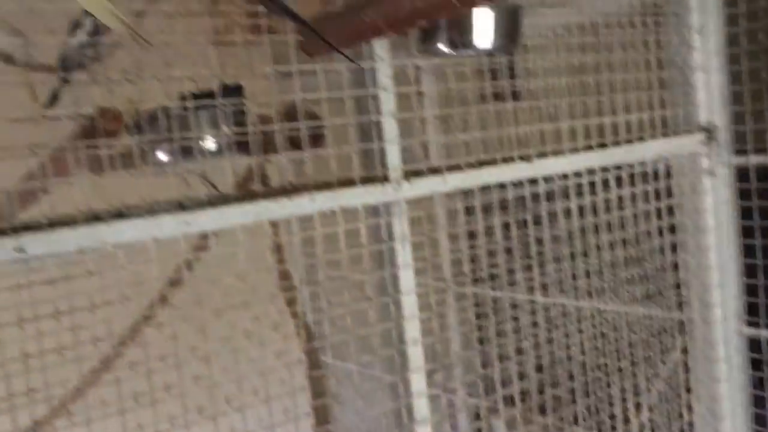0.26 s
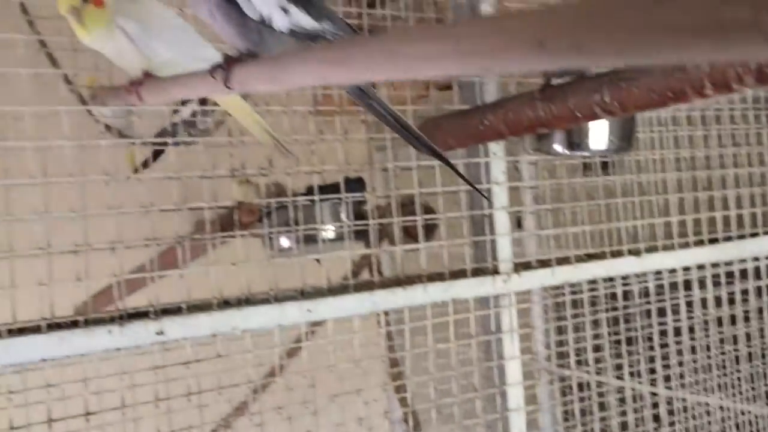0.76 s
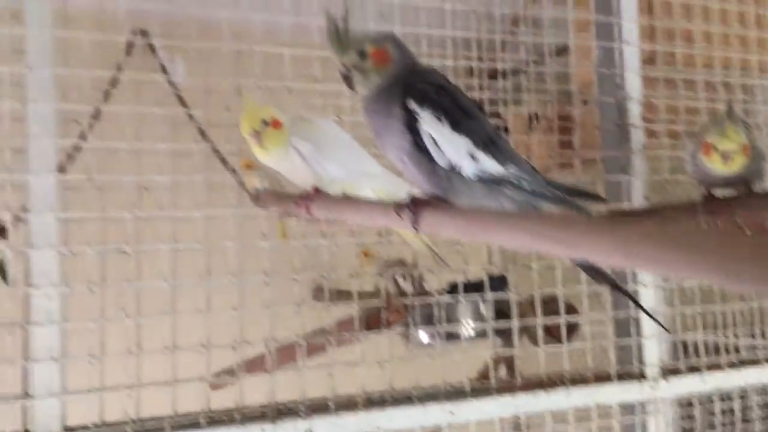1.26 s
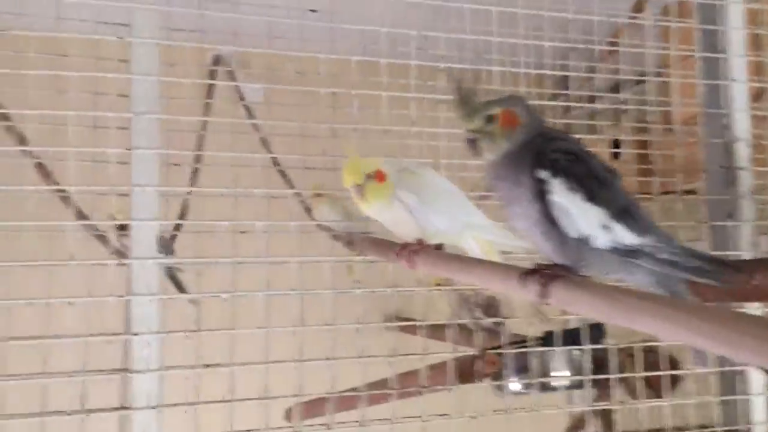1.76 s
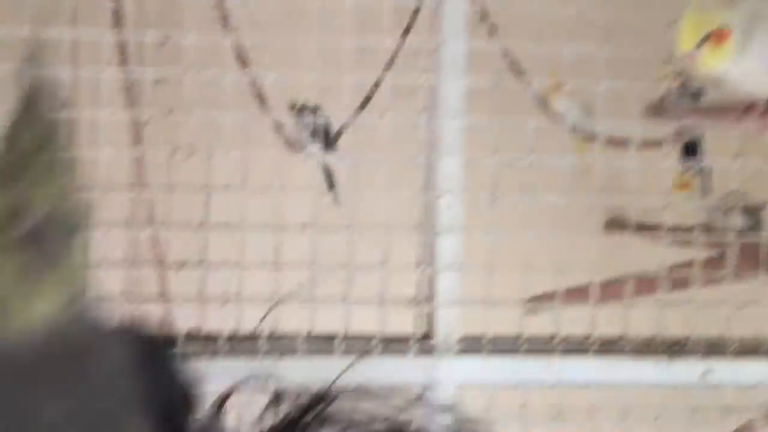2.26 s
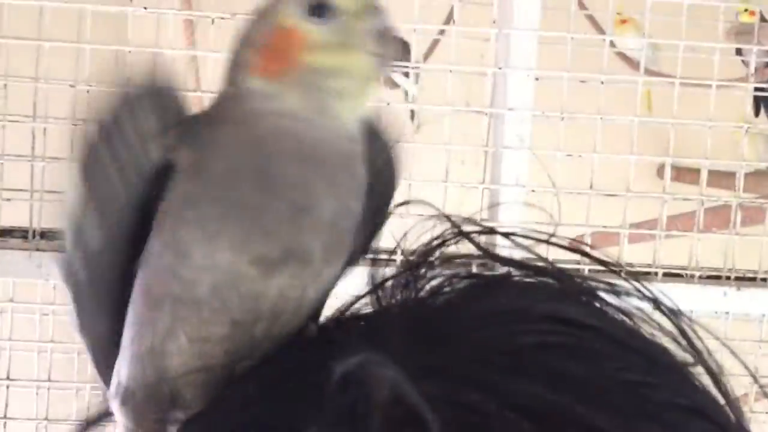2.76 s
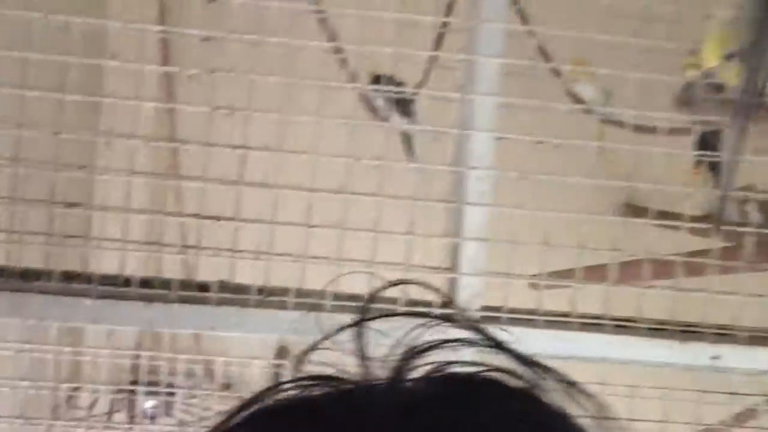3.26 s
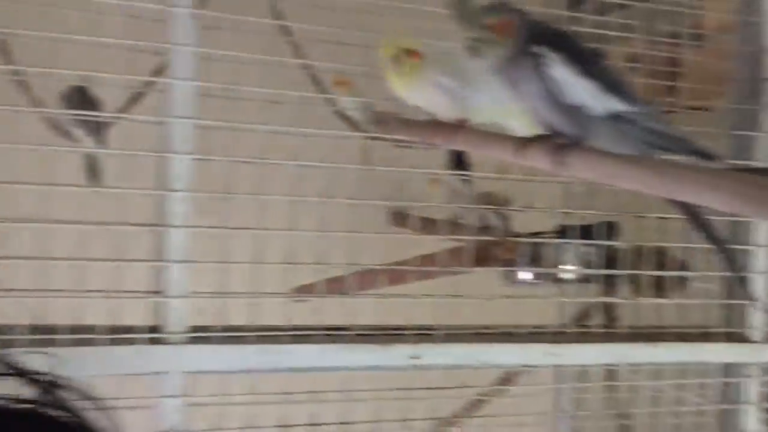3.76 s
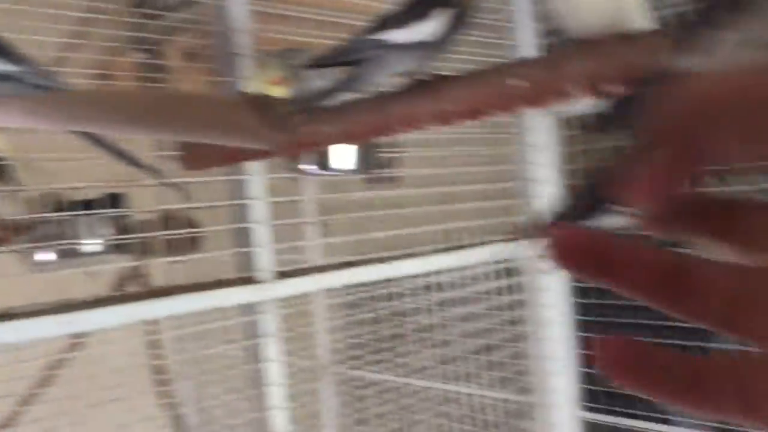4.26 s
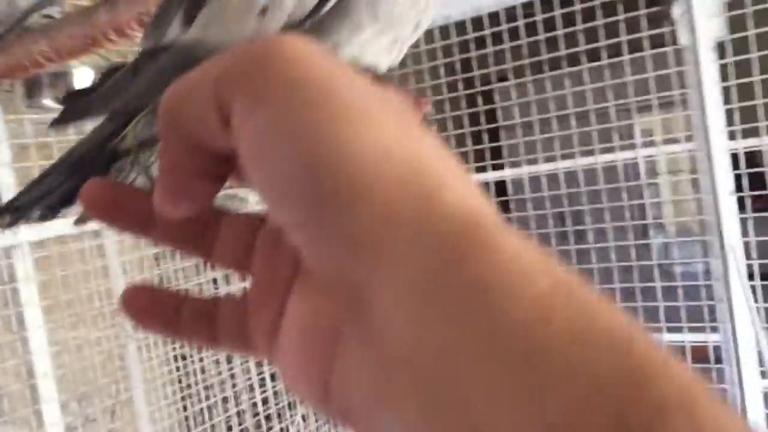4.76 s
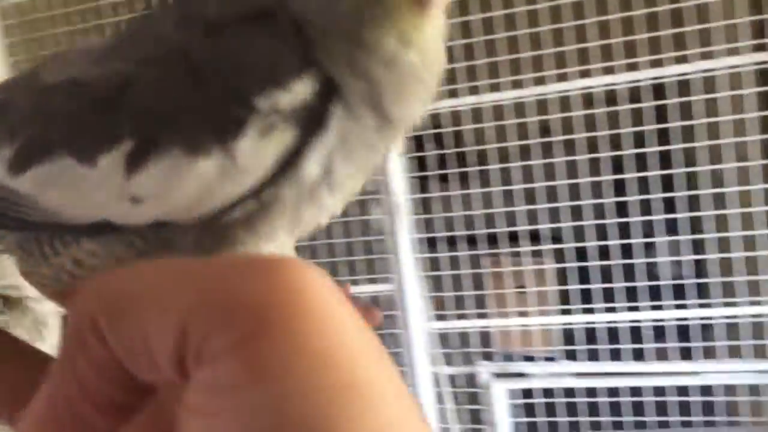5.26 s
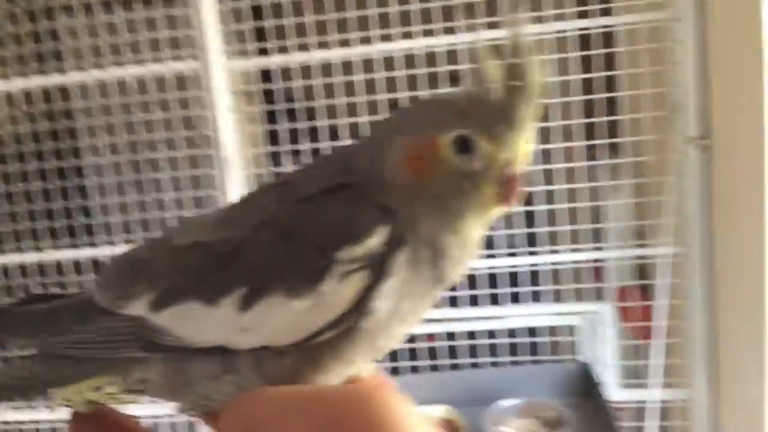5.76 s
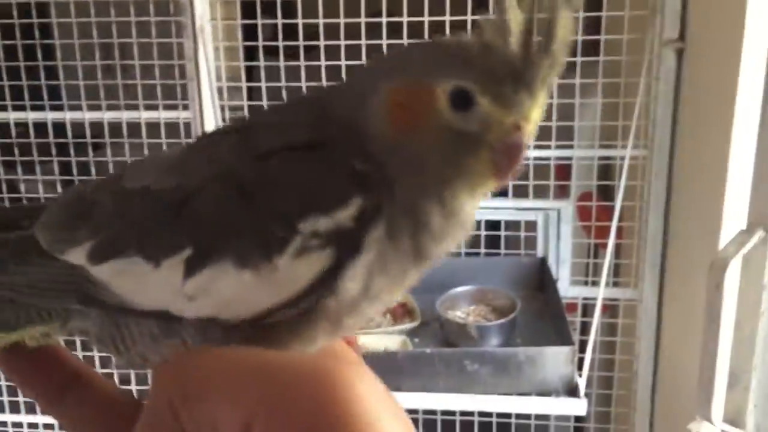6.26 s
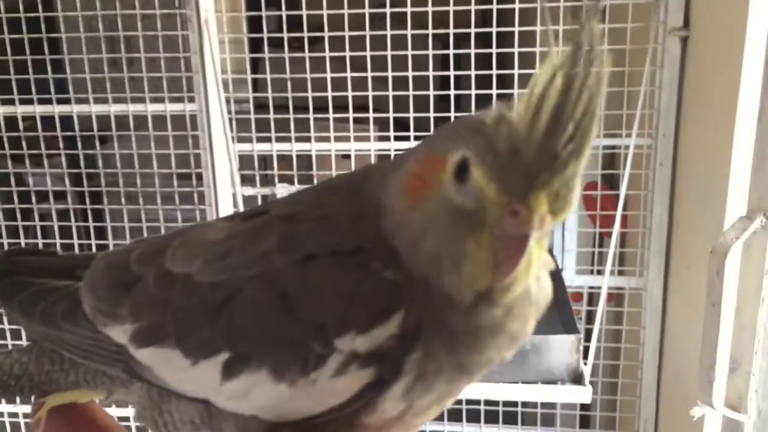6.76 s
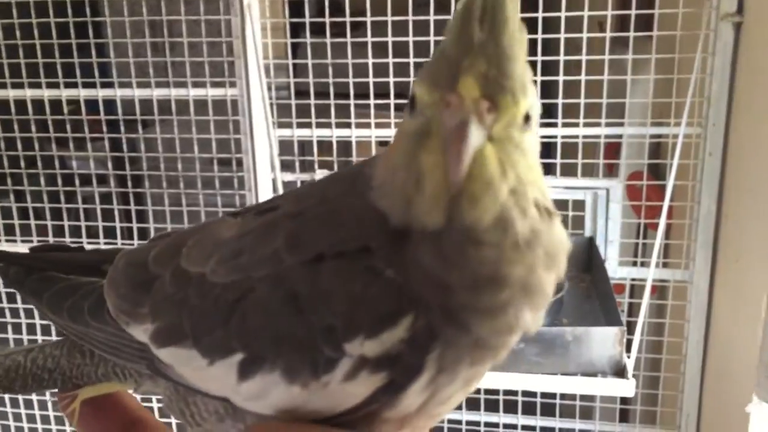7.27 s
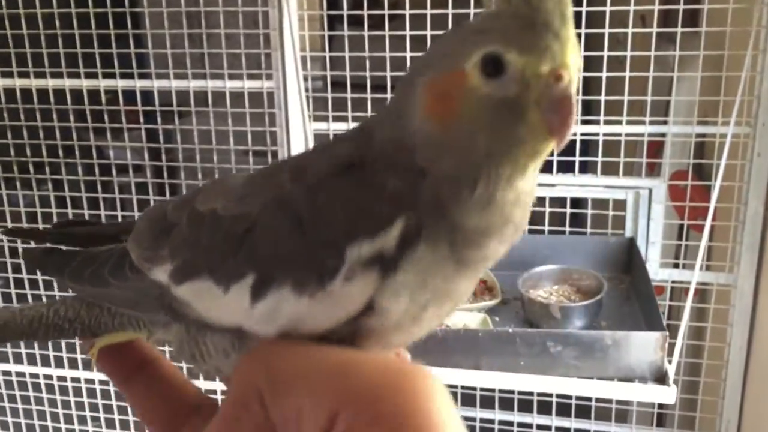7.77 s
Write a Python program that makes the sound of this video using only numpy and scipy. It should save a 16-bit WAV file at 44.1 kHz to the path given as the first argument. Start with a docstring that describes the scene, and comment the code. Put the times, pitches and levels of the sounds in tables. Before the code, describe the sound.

In a hard, echoing aviary, soft feather flutters and faint wire ticks lead to one loud, harsh cockatiel squawk. A bird takes off close by, its wings rustling and its draught thumping the handheld microphone. Then come a rising raspy call, a piercing falling whistle and, later, a broken chain of squawks and chirps, over low throbbing rumble and very faint hiss.

```python
"""Cockatiels in an echoing aviary

Cockatiels squawk and whistle near and far: harmonics of the syrinx, filtered by throat and beak.
Claws and beaks ping cage wires (scratched stiff modes); a bird takes off past a handheld microphone,
its wings rustling (strokes of shaped noise) and their draught thumping on the port (damped swings).
A low rumble throbs (swells of bass noise) under a faint, patchy hiss (noise in half-octave bands).
Feedback delays echo the birds, wires and wings."""
import sys
import numpy as np
from scipy import signal
from scipy.fft import rfft, irfft, next_fast_len
from scipy.io import wavfile
from scipy.ndimage import uniform_filter1d

SR = 44100
rng = np.random.default_rng(int(sys.argv[2]) if len(sys.argv) > 2 else 0)


def bounce(signal):
    """Save signal as a 16-bit WAV file at the path given by the first command-line argument."""
    frames = np.transpose(np.atleast_2d(signal))
    limited = np.clip(frames, -1, 1)
    pcm = np.round(limited * 32767).astype(np.int16)
    wavfile.write(sys.argv[1], SR, pcm)


N = 353682


def amp(db):
    """Decibel law: level to amplitude gain."""
    return 10 ** (np.asarray(db) / 20)


def rms_one(x):
    """Normalisation: a signal divided by its root mean square."""
    return x / np.sqrt(np.mean(x ** 2) + 1e-20)


def at_hz(points, hz):
    """Log-frequency interpolation: a curve of (hz, value) read at any frequency."""
    points = np.array(points)
    return np.interp(np.log(hz), np.log(points[:, 0]), points[:, 1])


def level(rows):
    """Envelope: gain along a curve of (time_s, level_db), silent outside it."""
    s, db = np.transpose(rows)
    return amp(np.interp(np.arange(N) / SR, s, db, left=-200, right=-200))


def wander(size, rate_hz, count=1):
    """Low-passed noise: rows of smooth random motion of spread 1, from a double pole."""
    r = np.exp(-2 * np.pi * rate_hz / SR)
    run_in = round(SR / rate_hz)
    noise = rng.standard_normal((count, size + run_in))
    smooth = rms_one(signal.lfilter([1], [1, -2 * r, r * r], noise))
    return smooth[:, run_in:].squeeze()


def coloured(spectrum):
    """Spectral shaping: white noise weighted by a curve of (hz, density_db), scaled to rms 1."""
    hz = np.maximum(np.fft.rfftfreq(N, 1 / SR), 1)
    return rms_one(irfft(rfft(rng.standard_normal(N)) * amp(at_hz(spectrum, hz)), N))


def ring(x, hz, t60):
    """Damped resonator: a unit click starts a sine of height 1 that loses 60 dB in t60 seconds."""
    r, w = amp(-60 / (t60 * SR)), 2 * np.pi * hz / SR
    return signal.lfilter([0, np.sin(w)], [1, -2 * r * np.cos(w), r * r], x)


def add(out, s, x):
    """Superposition: x summed into out from time s."""
    i = round(s * SR)
    out[i:i + len(x)] += x[:N - i]


# relative spectral density of the room hiss: hz, density_db
HISS_COLOUR = [(120, -25), (200, 0.5), (588, -12), (1390, -11), (3280, -19.5), (4390, -19.5), (4810, -23),
               (12900, -33), (15800, -32)]
# gain of the hiss over time: time_s, level_db
HISS_LEVEL = [(0, -60), (.6, -70.5), (1.3, -69.5), (4, -64), (5.6, -64.5), (5.9, -70), (8.02, -69.5)]


def hiss():
    """Independent band modulation: each half-octave of noise swells and sinks on its own."""
    out, noise = 0, rfft(coloured(HISS_COLOUR))
    hz = np.maximum(np.fft.rfftfreq(N, 1 / SR), 100)
    band = np.floor(2 * np.log2(hz / 100))   # all below 100 Hz joins the lowest band
    for k in np.unique(band):
        # drawn at every 50th sample, so the 300 Hz motion slows to 6 Hz
        patches = np.repeat(wander(N // 50 + 1, rate_hz=300), 50)[:N]
        swell = amp(4 * uniform_filter1d(patches, size=50))
        out = out + irfft(noise * (band == k), N) * swell
    return level(HISS_LEVEL) * out


# gain of the rumble bed over time: time_s, level_db
RUMBLE_LEVEL = [(0, -55), (.45, -56), (.6, -64), (1.05, -68.5), (1.3, -73), (3.4, -48), (4, -59.5),
                (8.02, -61.5)]
# relative spectral density of the bed: hz, density_db
RUMBLE_COLOUR = [(13, -48.5), (22, -38), (70, 15.5), (119, -3), (265, -9.5), (300, -10), (450, -11),
                 (580, -48.5), (990, -120)]
# evenly spaced runs of throbs: first_s, end_s, period_s, level_db
THROB_RUNS = [(0.195, .3, .3, -41.5), (1.087, 1.2, .3, -47.5), (1.389, 2.8, 0.3, -42.5),
              (3.52, 4.5, 0.27, -46.5), (4.705, 6.9, .34, -46.5), (7.05, 8, .315, -45)]
# upper band edge of the throbs over time: time_s, edge_hz
THROB_TOP = [(0, 95), (4, 105), (4.7, 145), (6, 183), (8.02, 195)]
THROB_BOTTOM_HZ, THROB_RISE_S, THROB_T60_S = 45, .026, .94


def rumble():
    """Periodic amplitude modulation: swells of band-limited bass noise repeat over a deep noise bed."""
    out, t = level(RUMBLE_LEVEL) * coloured(RUMBLE_COLOUR), np.arange(SR // 2) / SR
    for first, end, period, db in THROB_RUNS:
        swell = (1 - np.exp(-t / THROB_RISE_S)) * amp(db - 60 * t / THROB_T60_S)
        for s in np.arange(first, end, period):
            top_hz = np.interp(s, *np.transpose(THROB_TOP))
            band = signal.butter(4, [THROB_BOTTOM_HZ, top_hz], "band", fs=SR, output="sos")
            settled = signal.sosfilt(band, rng.standard_normal(SR))[SR // 2:]
            add(out, s, rms_one(settled) * swell)
    return out


# puffs of wing draught on the port: start_s, peak_db, swing_hz
PUFFS = [(2.946, -10.5, 56.5), (2.988, -20, 116), (3.038, -32, 58.5), (3.113, -32, 76), (3.166, -25.5, 85),
         (3.195, -26.5, 91.5), (3.222, -20, 123), (3.296, -23.5, 98)]
PUFF_T60_CYCLES = 7.5


def draught():
    """Impulse excitation: each puff is a soft push of air that sets the port in a damped swing."""
    out = np.zeros(N)
    for s, db, hz in PUFFS:
        push = np.zeros(SR // 4)
        push_length = round(.3 * SR / hz)   # under a third of a cycle
        push[:push_length] = np.hanning(push_length)
        swing = ring(np.gradient(push), hz, PUFF_T60_CYCLES / hz)
        add(out, s, amp(db) * swing / abs(swing).max())
    return out


# relative spectral density of the feather noise: hz, density_db
FEATHERS = [(250, -21.5), (600, -2.5), (1500, -5), (3000, -11), (6000, -11), (10500, -15), (13000, -14),
            (15800, -7)]
# downstrokes of wings and single shakes of feathers: start_s, level_db
STROKES = [(.039, -61), (0.112, -45), (0.206, -46), (0.294, -46), (.409, -62), (.724, -67), (.795, -60),
           (1.956, -54.5), (2.014, -55), (2.533, -52), (2.851, -57), (2.898, -39), (3.016, -48.5),
           (3.109, -50), (3.225, -51.5), (3.312, -49.5), (3.416, -42.5), (3.516, -45.5), (3.601, -46),
           (3.733, -52), (3.815, -55.5), (4.241, -57), (4.3, -50.5), (5.301, -56), (5.374, -56.5),
           (5.453, -51.5), (5.519, -52.5), (5.606, -76.5)]
STROKE_RISE_S, STROKE_T60_S, UPSTROKE_DB = .0096, .23, -11.5
SNAP_DB, SNAP_T60_S = -5, .053   # each stroke opens with a snap
FLIGHT_GAP_MIN_S, FLIGHT_GAP_MAX_S = .08, .14   # downstrokes this far apart have an upstroke midway


def wings():
    """Friction noise: feathers rustle at each stroke; in flight a weaker upstroke falls between."""
    envelope, t = np.zeros(N), np.arange(SR // 4) / SR
    snap = amp(SNAP_DB - 60 * t / SNAP_T60_S)
    stroke = (1 - np.exp(-t / STROKE_RISE_S)) * amp(-60 * t / STROKE_T60_S) + snap
    for (s, db), (next_s, _) in zip(STROKES, STROKES[1:] + [(np.inf, 0)]):
        add(envelope, s, amp(db) * stroke)
        if FLIGHT_GAP_MIN_S < next_s - s < FLIGHT_GAP_MAX_S:
            add(envelope, (s + next_s) / 2, amp(db + UPSTROKE_DB) * stroke)
    flicker = amp(1.7 * wander(N, rate_hz=40))
    return envelope * flicker * coloured(FEATHERS)


# pings of cage wires, peaks before the mix; the last row instead adds a bright ringing to a small chirp at 7.87
# s: start_s, peak_db, wire_constant_hz
PINGS = [(1.186, -45, 199), (1.302, -40, 195.6), (1.424, -32.5, 258.6), (1.564, -38.5, 226),
         (1.691, -40.5, 221), (1.938, -44, 228.5), (3.902, -45.5, 229), (4.117, -48, 228),
         (4.226, -34.5, 226), (5.77, -64.5, 211.5), (6.266, -58.5, 214.4), (6.435, -44.5, 234.2),
         (6.76, -42, 205), (7.875, -62.5, 252)]
SCRATCH_RISE_S, SCRATCH_FADE_S, WIRE_T60_S = .0031, .044, .008
WIRE_CRACK_DB, WIRE_LOUD_HZ, WIRE_SLOPE_DB = 14, 8050, 6   # modes weaken per octave away from the loud one


def wires():
    """Bending modes: a wire welded at both ends, scratched by claw or beak, rings at c (n + 1/2)^2."""
    out, t = np.zeros(N), np.arange(SR // 4) / SR
    scratch_shape = (1 - np.exp(-t / SCRATCH_RISE_S)) * np.exp(-t / SCRATCH_FADE_S)
    for s, db, wire_hz in PINGS:
        scratch = rng.standard_normal(len(t)) * scratch_shape
        ping = amp(WIRE_CRACK_DB) * np.diff(scratch, prepend=0)
        for hz in wire_hz * (np.arange(2, 8) + .5) ** 2:
            mode_db = rng.normal(0, 2) - WIRE_SLOPE_DB * abs(np.log2(hz / WIRE_LOUD_HZ))
            ping = ping + amp(mode_db) * ring(scratch, hz, WIRE_T60_S)
        add(out, s, amp(db) * ping / abs(ping).max())
    return out


def syrinx(pitch, rough):
    """Harmonic source: roughness shakes the pitch and blurs each line into a band of noise."""
    size, order = len(pitch), np.arange(1, 24)[:, None]
    shaken = pitch * (1 + .0785 * rough * wander(size, rate_hz=300))
    cycle = 2 * np.pi * np.cumsum(shaken) / SR
    phase = order * cycle + .7 * order ** 2   # spread phases, no sharp pulses
    blur = wander(size, rate_hz=450, count=46)
    blurred = blur[:23] * np.sin(phase) + blur[23:] * np.cos(phase)
    share = np.clip(rough * (1 + .17 * (order - 1)), 0, 1)   # high lines blur more
    lines = (1 - share) * np.sin(phase) + share * blurred
    return (lines * (order * pitch < .4 * SR)).sum(axis=0)


# resonances of windpipe and beak, shared by all birds: hz, gain_db
THROAT = [(600, 5), (1400, 7), (2800, 1), (5300, -3), (7500, -7), (8600, -3.5), (10500, -11),
          (15000, -12.5)]
LEAK_DB = -43.5   # a little of every line passes the throat


def throat_and_beak(buzz, colour, lowest_hz):
    """Source-filter principle: throat slopes and a beak resonance colour the buzz of the syrinx."""
    peak_hz, above_db, below_db, beak_hz, beak_db, _ = colour
    hz = np.maximum(np.fft.rfftfreq(len(buzz), 1 / SR), 1)
    octaves = np.log2(hz / peak_hz)
    slopes_db = below_db * np.minimum(octaves, 0) - above_db * np.maximum(octaves, 0)
    resonance_db = beak_db * np.exp(-(np.log2(hz / beak_hz) / .14) ** 2)
    throat_db = at_hz(THROAT, hz) + slopes_db + resonance_db
    # little leaves the beak below the fundamental
    radiated = 1 / (1 + (.8 * lowest_hz / hz) ** 6)
    return irfft(rfft(buzz) * (amp(throat_db) + amp(LEAK_DB)) * radiated, len(buzz))


# rough voices come in uneven bursts; the swing is full from this roughness up
RASP_DB, RASP_HZ, RASP_FULL_AT = 3.5, 126.6, .12


def call(colour, rows):
    """Modulated voice: pitch, level and roughness follow the gesture, with rasping bursts."""
    s, *columns = np.transpose(rows)
    t = np.arange(s[0], s[-1], 1 / SR)
    pitch, db, rough = [np.interp(t, s, c) for c in columns]
    rough = np.clip(rough, 0, 1)
    voice = throat_and_beak(syrinx(pitch, rough), colour, pitch.min())
    # a running 20 ms level is evened out so that the gesture sets the loudness
    evened = voice / np.sqrt(uniform_filter1d(voice ** 2, size=SR // 50) + 1e-12)
    fade = np.clip(np.minimum(t - s[0], s[-1] - t) / .003, 0, 1)
    rasp_depth_db = RASP_DB * np.clip(rough / RASP_FULL_AT, 0, 1)
    rasp_db = rasp_depth_db * np.tanh(wander(len(t), rate_hz=RASP_HZ))
    return evened * amp(db + rasp_db) * fade


FAR_ATTACK_S, FAR_RISE_DB, FAR_FALL_DB_PER_S, FAR_SAG_PER_S = .015, 7.5, 35, .2
# throat slopes in dB per octave; ratio of beak to throat resonance; direct sound in dB
FAR_ABOVE_DB, FAR_BELOW_DB, BEAK_OVER_THROAT, FAR_DIRECT_DB = 21.5, 15.5, 1.9, -1


def far_call(s, length, pitch, db, rough, throat_hz, beak_db):
    """Attack and decay: a quick rise, then level and pitch sag until the bird stops."""
    beak_hz = BEAK_OVER_THROAT * throat_hz
    colour = throat_hz, FAR_ABOVE_DB, FAR_BELOW_DB, beak_hz, beak_db, FAR_DIRECT_DB
    end_pitch = pitch * (1 - FAR_SAG_PER_S * length)
    end_db = db - FAR_FALL_DB_PER_S * length
    return colour, [(s, pitch, db - FAR_RISE_DB, rough),
                    (s + FAR_ATTACK_S, pitch, db, rough),
                    (s + length, end_pitch, end_db, rough)]


# near calls, each a colour and a gesture, levels before the direct and room gains
# colour: throat_peak_hz, fall_above_db_per_octave, fall_below_db_per_octave, beak_hz, beak_db, direct_db
# gesture rows: time_s, pitch_hz, level_db, roughness (held to 0-1)
NEAR_CALLS = [ ((2460, 18, 1.5, 9400, 20, 3.5), [(2.068, 1486, -38.5, .1), (2.076, 1544, -42, 0),
              (2.084, 1402, -29, .1), (2.096, 1310, -25, 0.3)]), ((1850, 14, 11.8, 9300, 14, 2.8),
              [(2.092, 683, -15, 0.34), (2.097, 714, -25, 0.38), (2.122, 701.3, -23.5, 0.44),
              (2.19, 700, -40, 0.56)]), ((4040, 7.6, 11.2, 6700, 4.2, 0.54), [(4.463, 1301, -47, 0.3),
              (4.485, 1394, -30.5, 1), (4.53, 2038, -22.5, 0.47), (4.57, 2122, -19.5, .25),
              (4.61, 2144, -25, 0.09), (4.635, 2109, -24.5, 0.42)]), ((5160, 29, 3.7, 6720, 12.1, 3.8),
              [(4.878, 3820, -39, 1.05), (4.89, 3654, -24.5, 0.68), (4.902, 3513, -19, 0.25),
              (4.92, 3156, -15, 0.22), (4.95, 3070, -22, 0.12), (4.975, 2985, -20, 0.03),
              (4.995, 2913, -30, 0.3)]), ((4767.5, 32, 1.5, 7400, 11, 0), [(4.975, 2560, -33.5, 0.07),
              (4.99, 2474, -22.5, 0), (5.01, 2450, -22, 0), (5.058, 2465, -15, 0.06),
              (5.075, 2512, -28, 0)]), ((4650, 12, 0.79, 5260, 7.5, 2.3), [(6.376, 1887, -41.5, .05),
              (6.383, 1773, -41.5, 0.1), (6.393, 1710, -39, 0.15), (6.41, 1357, -49, 0.5)]),
              ((3026, 9.5, 7, 4451, 7.5, -0.5), [(6.81, 1050, -51.5, .2), (6.815, 1095, -42.5, 0.31),
              (6.87, 1072, -32, 0.5), (6.92, 1115, -31, 0.38), (6.95, 1101, -34.5, 0.6),
              (6.985, 1184, -34.5, 0.24)]), ((2490, 11.7, 15, 5900, 5.1, 2.9), [(6.986, 1650, -50, .14),
              (6.997, 1787, -33, 0.2), (7.01, 2014, -28, 0), (7.055, 1922, -48, 0.1)]),
              ((2016.5, 22, 1, 3996.5, -13.5, 0.5), [(7.195, 1523, -54.5, 0.1), (7.205, 1630, -41.5, 0),
              (7.225, 2057, -42, 0.2), (7.24, 2320, -35, 0.2)]), ((2270, 19.7, 9.3, 5130, 23.3, 0.72),
              [(7.236, 1400, -22, 0.18), (7.244, 1633, -28.5, .05), (7.255, 1536, -19.5, .06),
              (7.263, 1406, -20, 0.31), (7.285, 1387, -19.5, .3)]), ((1800, 11.9, 13, 5197, 5.8, 2.3),
              [(7.258, 702, -46, 0.4), (7.29, 701.5, -20.5, 0.5), (7.32, 664.7, -23.5, .47),
              (7.35, 661, -32.5, 0.72)]), ((2693, 27, 7, 14496, 61.5, -0.5), [(7.35, 2854, -40.5, 0.15),
              (7.45, 2688, -32, 0.13), (7.465, 2628, -25.5, 0.06), (7.5, 2134, -39, 0.09)]), ]
# far calls, all of one shape, levels before the direct and room gains
# start_s, length_s, pitch_hz, level_db, roughness (0-1), throat_peak_hz, beak_db
FAR_CALLS = [(1.017, 0.15, 2056, -74, 0.2, 2030, -8), (1.18, 0.094, 2250, -61, 0.42, 2200, 16),
             (1.44, .2, 1560, -64, .1, 1550, 0), (1.56, 0.094, 2980, -61.5, .2, 2950, -8),
             (1.69, 0.097, 1292, -65.5, .1, 1300, 13), (1.721, 0.11, 2607, -61.5, 0.12, 2610, -8),
             (1.822, 0.078, 727, -50.5, .7, 1500, -2), (1.95, 0.11, 785, -51, .6, 1720, 13),
             (2.405, 0.064, 1471, -49.5, .03, 1450, 2), (2.53, 0.11, 691, -50, .65, 1890, -24),
             (2.865, 0.073, 866, -46.5, .7, 1770, 13), (2.95, .12, 830.4, -48.5, 0.73, 1780, 13),
             (3.428, .08, 881, -46, .8, 1915, 10), (3.523, 0.14, 854, -47.5, .7, 1800, 12),
             (4.87, 0.09, 497, -56.5, .6, 950, -9), (6.09, .27, 991, -60, .38, 1005, -12.5),
             (6.487, 0.055, 1044, -42, .65, 2190, 22), (7.483, .06, 2324, -56.5, 0.19, 7900, 0),
             (7.868, 0.036, 7480, -62, .6, 7350, -0.5), (7.935, 0.044, 11300, -68.5, 0.39, 11320, 0)]


def birds():
    """Direct and reverberant fields: the calls as heard straight, and as fed to the room."""
    direct, sent = np.zeros((2, N))
    for colour, rows in NEAR_CALLS + [far_call(*row) for row in FAR_CALLS]:
        voice, start = call(colour, rows), rows[0][0]
        add(direct, start, voice * amp(colour[-1]))
        add(sent, start, voice)
    return direct, sent


# reverberation time of the aviary: hz, t60_s
ROOM_T60 = [(500, 0.66), (1300, 0.72), (3500, 0.51), (9000, 0.36), (15000, 0.066)]
ROOM_DB = -1.5


def aviary(x):
    """Reverberation: parallel feedback delays lose 60 dB per decay time; three allpasses smear them."""
    size = next_fast_len(N + SR)
    hz = np.maximum(np.fft.rfftfreq(size, 1 / SR), 1)
    t60, answer = at_hz(ROOM_T60, hz), 0
    for k, lag in enumerate(np.geomspace(.011, .053, 24)):
        loop = amp(-60 * lag / t60) * np.exp(-2j * np.pi * hz * lag)
        answer = answer + (-1) ** k * np.sqrt(lag / .6) * loop / (1 - loop)
    for lag in (.0013, .0031, .0057):
        delay = np.exp(-2j * np.pi * hz * lag)
        answer = answer * (delay - .6) / (1 - .6 * delay)
    return irfft(rfft(x, size) * answer, size)[:N]


def scene():
    """Superposition: birds, wires and wings, direct and echoed; draught, rumble and hiss unechoed."""
    direct, sent = birds()
    cage, flutter = wires(), wings()
    room = amp(ROOM_DB) * aviary(sent + amp(3) * cage + amp(-6.5) * flutter)
    near = direct + amp(-1.5) * cage + flutter
    return (near + room + draught() + rumble() + hiss())[None]


CEILING = .8   # the highest peaks are rounded towards this
BEND = .054   # share of the squared signal added by the overdriven capsule
CUTOFF_HZ = 16300   # from here up the top is 70 dB down


def record(dry):
    """Quadratic distortion: the capsule adds sum and difference tones; peaks round, the top is cut."""
    no_offset = signal.butter(2, 60, "high", fs=SR, output="sos")
    bent = dry + signal.sosfilt(no_offset, BEND * dry ** 2)
    rounded = CEILING * np.tanh(bent / CEILING)
    return signal.sosfilt(signal.cheby2(14, 70, CUTOFF_HZ, fs=SR, output="sos"), rounded)


dry = scene()
out = record(dry)
bounce(out)
```